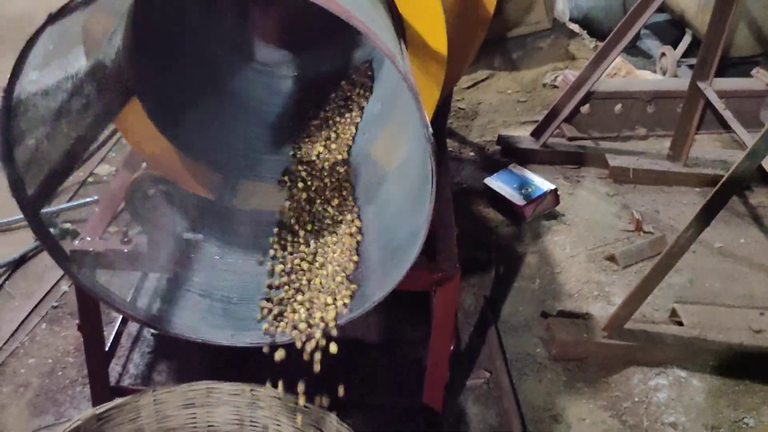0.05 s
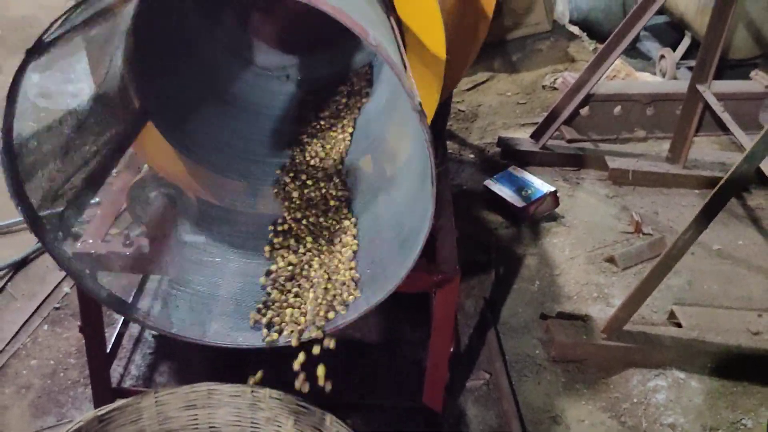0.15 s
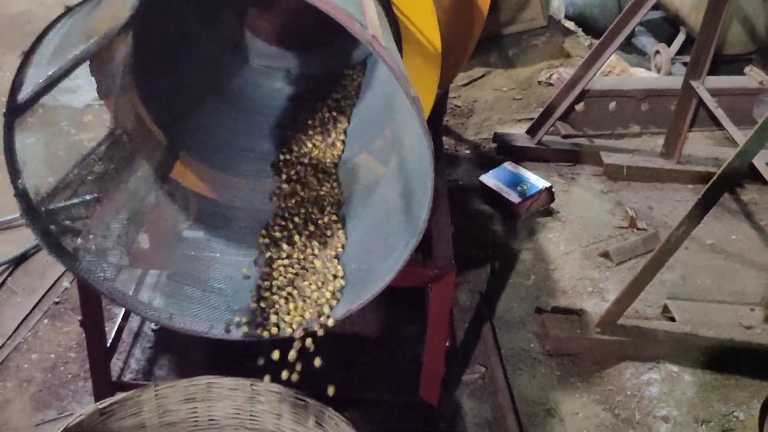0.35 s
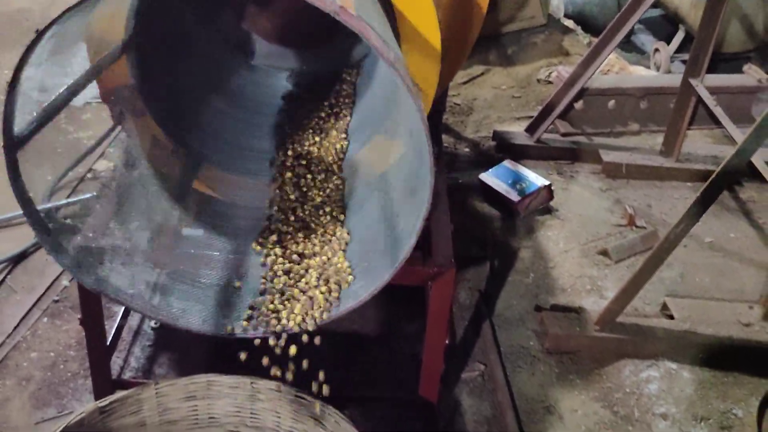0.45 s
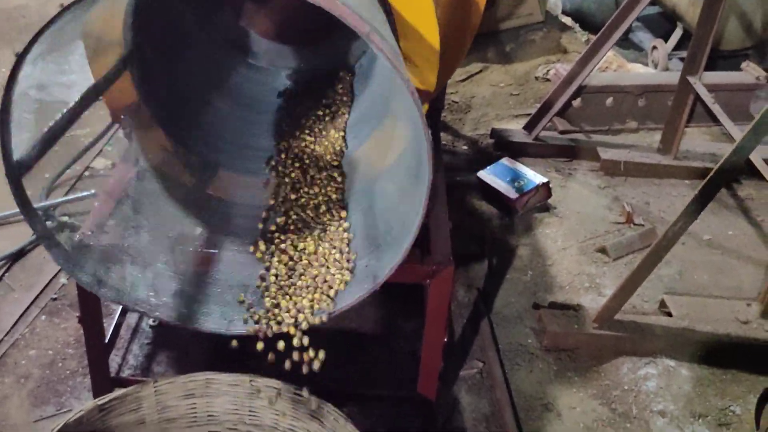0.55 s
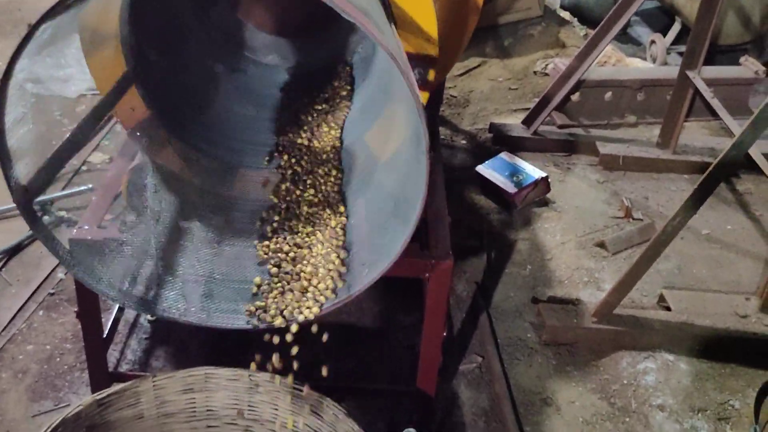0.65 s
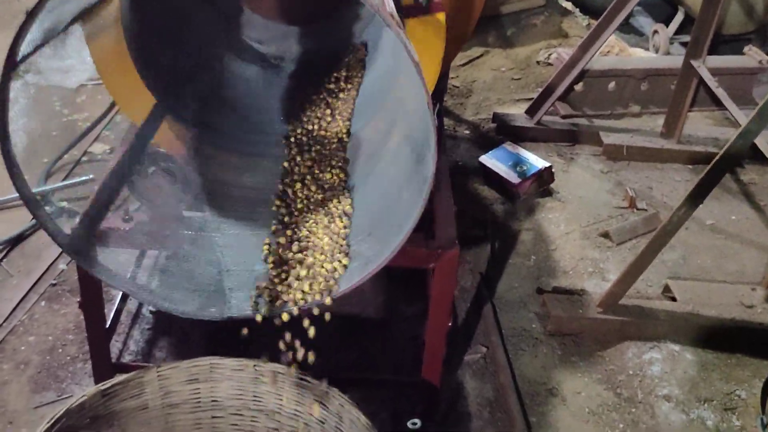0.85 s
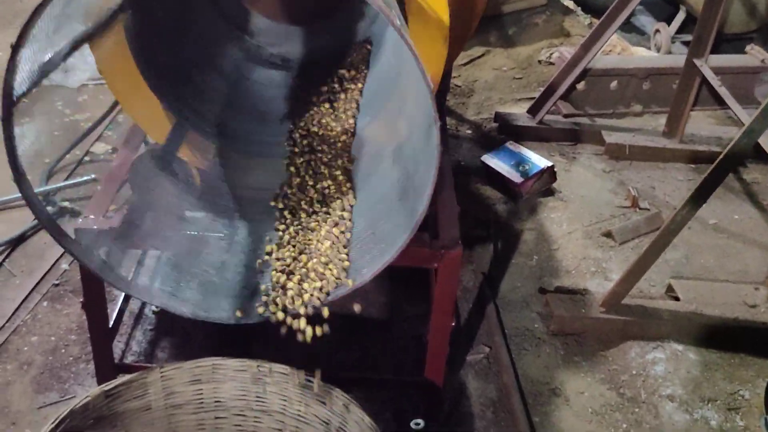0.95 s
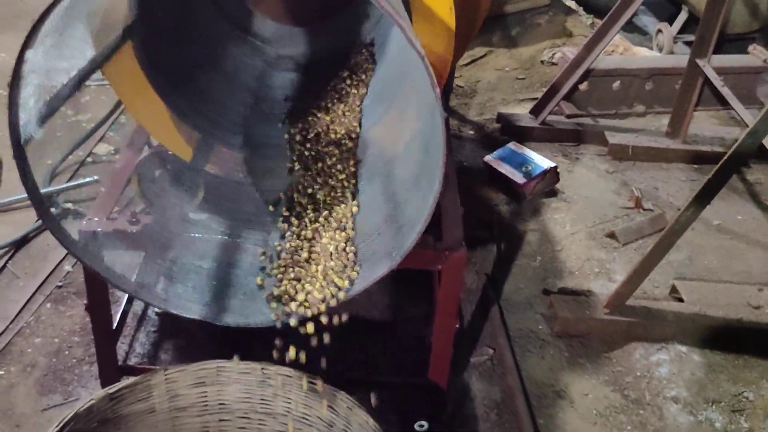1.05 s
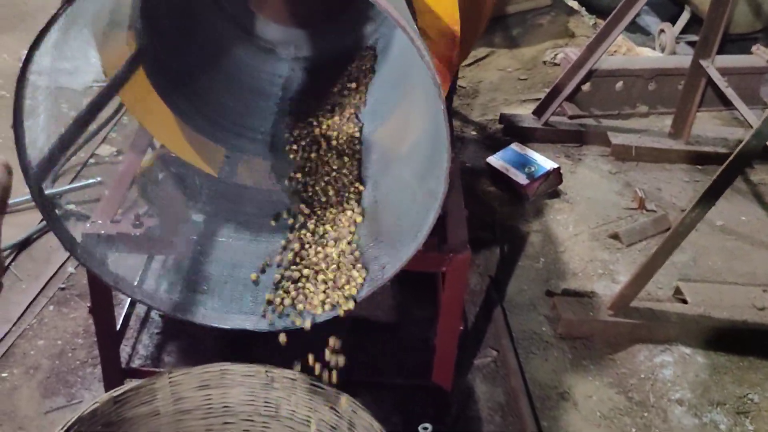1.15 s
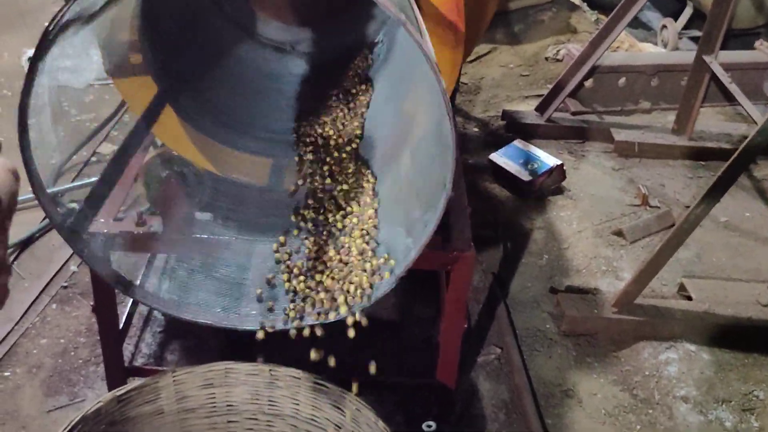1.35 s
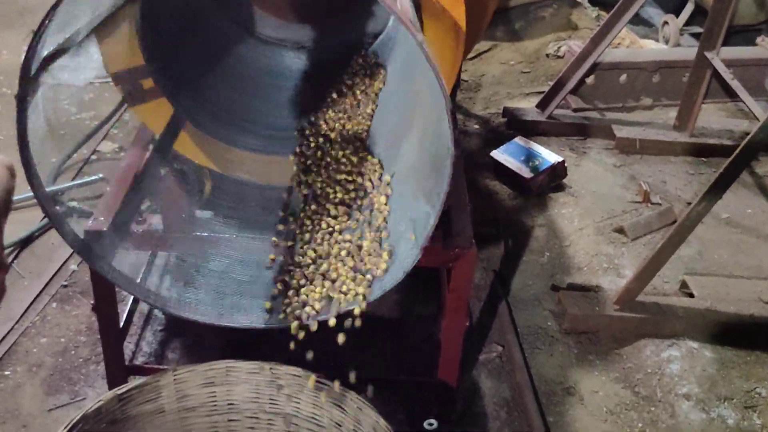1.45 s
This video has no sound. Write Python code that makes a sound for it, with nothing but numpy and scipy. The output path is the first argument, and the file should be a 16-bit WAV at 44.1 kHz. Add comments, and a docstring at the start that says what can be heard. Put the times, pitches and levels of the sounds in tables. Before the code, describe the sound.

Roasted beans slide in rattling surges down a steel drum over a faint motor hum.

```python
"""Roasted beans slide down the tilted steel drum of a roasting machine, in a surge about every 0.4 s.
Each surge is a shower of hard little impacts: bright as the first beans land on bare steel, then
thinning out as the heap settles. The impacts make the drum ring. A few stray beans tick.
Underneath, the drive motor hums and rumbles, and there is a faint high hiss."""
import sys
import numpy as np
from scipy import signal
from scipy.fft import rfft, irfft
from scipy.io import wavfile
from scipy.ndimage import uniform_filter1d

SR = 44100
rng = np.random.default_rng(int(sys.argv[2]) if len(sys.argv) > 2 else 0)


def wrap_up_sound(samples):
    """Save the sound to the file named by the first command line argument, as 16-bit audio."""
    columns = np.atleast_2d(samples).T
    # keep every value between -1 and 1, then stretch to whole-number steps
    tamed = np.clip(columns, -1, 1)
    steps = np.round(tamed * 32767).astype(np.int16)
    wavfile.write(sys.argv[1], SR, steps)


N = 66150

# tone colour of the hiss (frequency [Hz], relative level [dB])
HISS_COLOUR = [(1000, -64), (8000, -16), (11000, 3), (12100, -21), (13000, 8), (14500, 8), (15500, -23)]
# tone colour of the motor's rumble (frequency [Hz], relative level [dB])
RUMBLE_COLOUR = [(20, -31), (40, -11), (65, 1.5), (110, -1), (180, 6), (260, -2.5), (400, -5), (700, -7.5),
                 (1300, -13.5), (4000, -19.5), (15000, -26)]
# how the motor's main hum swells and wavers (time [s], level [dB], pitch [Hz])
MAIN_HUM = [(0.0, -55, 210), (0.039, -36, 207.2), (0.15, -66, 212.6), (0.29, -44.5, 211.1),
            (0.47, -42, 210.8), (0.55, -48.5, 210.7), (0.7, -46, 210.1), (0.78, -49, 211.2),
            (0.84, -44, 206), (1.0, -50.5, 212.4), (1.08, -37.5, 200.2), (1.18, -50, 210.9),
            (1.33, -46.5, 201), (1.5, -54, 197.5)]
# the motor's weaker hum tones (pitch [Hz], level [dB])
WEAK_HUMS = [(99.6, -56.5), (151, -53.5), (252, -53), (388, -56.5)]
# ticks of stray beans (time [s], level [dB], left minus right [dB])
STRAY_TICKS = [(0.095, -33.5, 5), (0.133, -36, 7), (0.167, -27, 6.5), (0.187, -25.5, 5), (0.944, -41, 6)]
# tone colour of one tick (frequency [Hz], relative level [dB])
TICK_COLOUR = [(500, -22), (4000, -9), (6000, 4), (7500, 7), (9500, -9), (12000, -3), (14000, 0),
               (15500, -11)]
# the drum's strongest ringing tones (pitch [Hz], relative level [dB], time to fade by 60 dB [s])
DRUM_TONES = [(460, -7.5, 0.9), (585, -3, 0.28), (1370, -4.5, 0.16), (1488, -3, 0.29), (2327, -7, 0.09),
              (2776, 1.5, 0.16), (3350, -5, 0.15), (4170, -7.5, 0.21), (4150, 0.5, .25), (4490, 2.5, 0.1),
              (5170, 4, 0.17), (5720, -4, 0.22), (6120, 0, .2), (7110, 7, 0.87), (7580, 9, 0.11),
              (7900, 4, 0.19)]
# tone colour of beans on bare steel (frequency [Hz], relative level [dB])
STEEL_COLOUR = [(200, -17.5), (600, -10.5), (1000, -17.5), (3000, -10.5), (5800, 0), (7500, 8.5),
                (8600, 1.5), (10000, -4), (12000, -11.5), (15000, -19)]
# tone colour of the sliding heap (frequency [Hz], relative level [dB])
HEAP_COLOUR = [(100, -24), (250, -9.5), (550, -14.5), (900, -15), (1500, -10), (2700, -6.5), (3600, -4.5),
               (4300, -3.5), (5000, -5), (6200, 0), (7600, -1.5), (8500, -7.5), (9600, -17), (12000, -20),
               (13800, -18), (15500, -43)]
# the side the heap is heard from (frequency [Hz], left minus right [dB])
HEAP_SIDES = [(200, -3), (600, -6.5), (1500, 2), (4000, -0.5), (6200, 4.5), (7400, -6), (9000, -1),
              (11500, 3), (13500, 13.5), (15000, -8)]
# surges of beans (start [s], level [dB], landing's rise time [s], hold time [s],
# settling speed [dB/s], landing level relative to the surge [dB])
BEAN_SURGES = [(-0.17, -25.5, 0.048, 0.054, 99, -6), (0.21, -17.5, 0.03, 0.037, 87.5, 1),
               (0.638, -18, 0.016, 0.059, 89, 1.5), (1.017, -17, .017, 0.046, 92, -1)]

HISS_DB, RUMBLE_DB = -58, -42.5
HUM_WAVER_DB, HUM_DRIFT = 2, 0.01197  # drift is a fraction of the pitch
WASH_DB, DRUM_TONES_DB = -3, -12  # relative to the impacts that cause them
WASH_FADE_S, TREBLE_FADE_S, TREBLE_HZ = 0.34, 0.15, 8340  # fades are times to drop by 60 dB
TICK_DECAY_S, CHATTER_DECAY_S, LANDING_DECAY_S = 0.0024, 0.0015, 0.064  # times to drop to 37 %
REST_HITS_PER_S, EXTRA_HITS_PER_S, HIT_SPREAD_DB = 1000, 5000, 1
TRICKLE_DB = -46.5  # beans that keep rolling between surges
HEAP_GATHER_S = 0.008  # the heap takes this much longer than the first beans to get going


def gain(db):
    """Turn decibels into a number to multiply by."""
    return 10 ** (np.asarray(db) / 20)


def unit_power(x):
    """Scale to an average power of 1."""
    return x / np.sqrt(np.mean(x ** 2))


def pan(db):
    """Left and right gains; positive decibels move the sound to the left."""
    return gain(np.array([[1], [-1]]) * db / 2)


def curve(points, size):
    """Read a (frequency, value) table at every frequency of a spectrum."""
    hz, value = np.array(points, float).T
    return np.interp(np.log(np.fft.rfftfreq(size, 1 / SR) + 1), np.log(hz), value)


def colour(x, points, sides=None):
    """Give a sound a tone colour; sides moves each frequency left or right."""
    size = 2 * N
    gains = unit_power(gain(curve(points, size)))
    # fold the filter in time so that nothing sounds before the hit that causes it
    cepstrum = irfft(np.log(gains))
    cepstrum[1:N] *= 2
    cepstrum[N + 1:] = 0
    response = np.exp(rfft(cepstrum)) * (pan(curve(sides, size)) if sides else 1)
    return irfft(rfft(x, size) * response)[..., :N]


def ring(x, response):
    """Make every hit in x ring like the response, scaled to an energy of 1."""
    response = response / np.sqrt(np.sum(response ** 2, axis=-1, keepdims=True))
    return signal.fftconvolve(x, response, axes=-1)[:, :N]


def wander(steps_per_s):
    """A smooth random wobble, roughly between -1 and 1."""
    span = int(SR / steps_per_s)
    steps = rng.standard_normal(200)[np.arange(N) // span]
    return 1.3 * uniform_filter1d(uniform_filter1d(steps, span), span)


def tone(hz, db):
    """A pure tone whose pitch and level can move."""
    return np.sqrt(2) * gain(db) * np.sin(2 * np.pi * np.cumsum(hz) / SR)


def hiss():
    """A faint steady hiss, high and to the left."""
    return gain(HISS_DB) * pan(16.5) * colour(rng.standard_normal((2, N)), HISS_COLOUR)


def motor(t):
    """The motor hums in wavering tones over a rumble that is centred in the bass and wider above."""
    times, level_db, pitch_hz = np.array(MAIN_HUM).T
    hum = tone(np.interp(t, times, pitch_hz), np.interp(t, times, level_db))
    for hz, db in WEAK_HUMS:
        hum += tone(hz * (1 + HUM_DRIFT * wander(11)), db + HUM_WAVER_DB * wander(8.9))
    middle, side = colour(rng.standard_normal((2, N)), RUMBLE_COLOUR)
    side = signal.sosfilt(signal.butter(1, 970, "high", fs=SR, output="sos"), side)
    rumble = gain(RUMBLE_DB) * np.array([middle + side, middle - side])
    return (hum + rumble) * pan(-0.8)


def stray_beans(t):
    """Single beans tick, each a short, dry burst of noise."""
    ticks = 0
    for start, db, side_db in STRAY_TICKS:
        fade = (t >= start) * np.exp(-np.abs(t - start) / TICK_DECAY_S)
        ticks = ticks + gain(db) * pan(side_db) * fade * rng.standard_normal((2, N))
    return colour(ticks, TICK_COLOUR)


def drum_wash(t, hits):
    """The hits plus the steel drum's many close tones, which blur into noise; the highest die first."""
    noise = rng.standard_normal((2, N))
    low = signal.sosfiltfilt(signal.butter(4, TREBLE_HZ, fs=SR, output="sos"), noise)
    treble = noise - low
    response = low * gain(-60 * t / WASH_FADE_S) + treble * gain(-60 * t / TREBLE_FADE_S)
    return (hits + gain(WASH_DB) * ring(hits, response)) / np.hypot(1, gain(WASH_DB))


def drum_tones(t, hits):
    """A few tones of the struck drum stand out as a metallic sheen."""
    response = 0
    for hz, db, fade_s in DRUM_TONES:
        fade = gain(db - 60 * t / fade_s) / np.sqrt(fade_s)  # a longer ring starts softer
        response = response + fade * np.sin(2 * np.pi * hz * t)
    return gain(DRUM_TONES_DB) * ring(hits, response[None])


def narrow_bass(x, below_hz=690, width=0.35):
    """Low sounds have long waves, which reach both sides nearly alike."""
    middle, side = (x[0] + x[1]) / 2, (x[0] - x[1]) / 2
    low = signal.sosfiltfilt(signal.butter(2, below_hz, fs=SR, output="sos"), side)
    side = side - (1 - width) * low
    return np.array([middle + side, middle - side])


def bean_impacts(t, flow):
    """Beans hit at random, more often and harder in a strong flow; each click has a noisy tail."""
    chance = (REST_HITS_PER_S + EXTRA_HITS_PER_S * flow / flow.max()) / SR
    sizes = unit_power(gain(HIT_SPREAD_DB * np.clip(rng.standard_normal(N), -2, 2)))
    hits = (rng.random(N) < chance) * sizes * rng.choice([-1, 1], N)
    hits *= flow / np.sqrt(chance)  # the overall level follows the flow
    delays = rng.integers(0, SR // 2000, (2, N))  # a hit reaches the two sides up to 0.5 ms apart
    clicks = np.array([np.bincount(np.arange(N) + delay, hits)[:N] for delay in delays])
    tail = np.exp(-t / CHATTER_DECAY_S)
    tail_power = np.abs(signal.fftconvolve(hits ** 2, tail / tail.sum())[:N])
    chatter = np.sqrt(tail_power) * rng.standard_normal((2, N))
    return (clicks + chatter) / np.sqrt(2)


def sliding_beans(t):
    """Each surge lands brightly on bare steel, then slides and settles as a heap; the drum rings."""
    heap_power, landing_flow = gain(TRICKLE_DB) ** 2, 0
    for start, db, rise, hold, settle_db_per_s, landing_db in BEAN_SURGES:
        age = t - start
        heap_rise = rise + HEAP_GATHER_S
        settling = gain(-settle_db_per_s * np.maximum(age - heap_rise - hold, 0))
        heap_power = heap_power + (gain(db) * np.clip(age / heap_rise, 0, 1) * settling) ** 2
        landing_fade = np.exp(-np.maximum(age - rise, 0) / LANDING_DECAY_S)
        landing_flow = landing_flow + gain(db + landing_db) * np.clip(age / rise, 0, 1) * landing_fade
    heap_hits = bean_impacts(t, np.sqrt(heap_power))
    heap = colour(heap_hits, HEAP_COLOUR, HEAP_SIDES)
    landing = colour(bean_impacts(t, landing_flow), STEEL_COLOUR) * pan(-6)
    return narrow_bass(drum_wash(t, heap + landing) + drum_tones(t, heap_hits))


def scene():
    """Beans in the drum over the running machine."""
    t = np.arange(N) / SR
    return sliding_beans(t) + stray_beans(t) + motor(t) + hiss()


def record(dry):
    """Cut the treble steeply above 15 kHz."""
    return signal.sosfilt(signal.ellip(8, 0.2, 80, 15000, fs=SR, output="sos"), dry)


dry = scene()
out = record(dry)
wrap_up_sound(out)
```